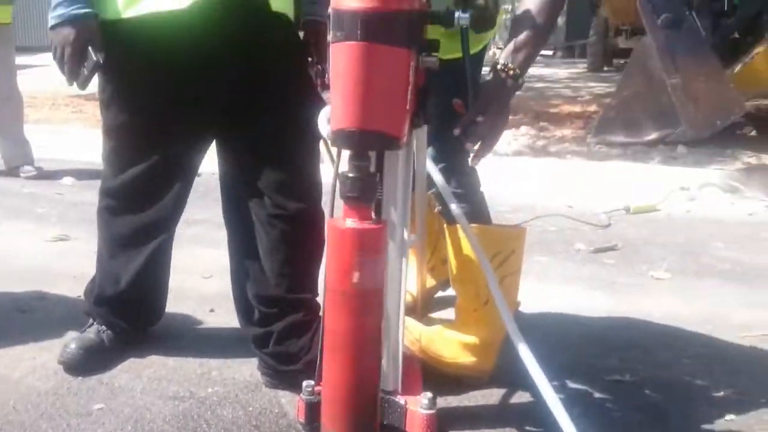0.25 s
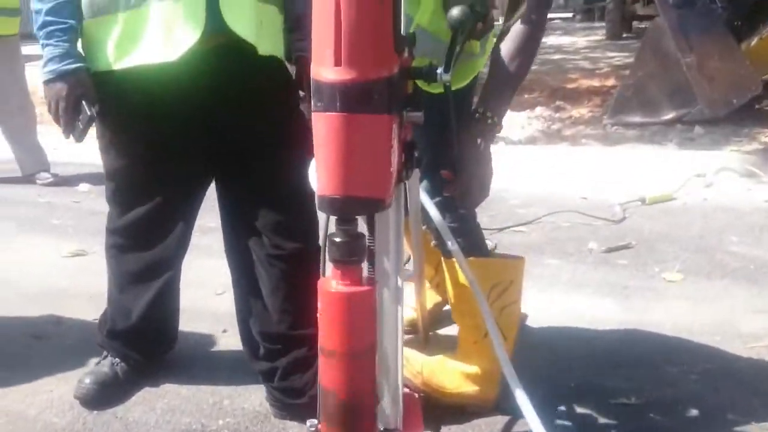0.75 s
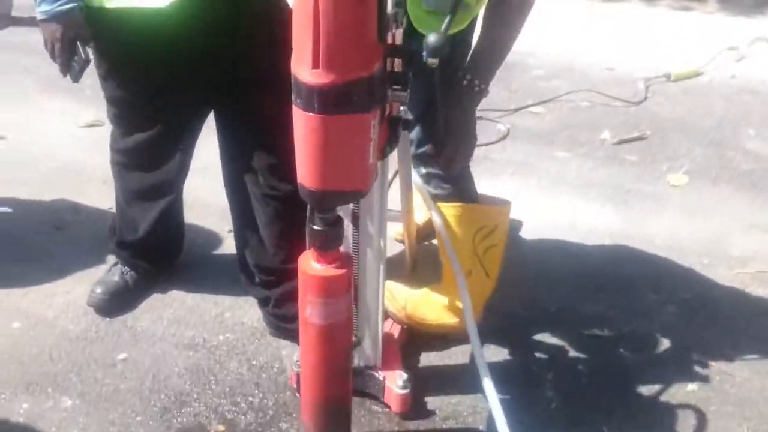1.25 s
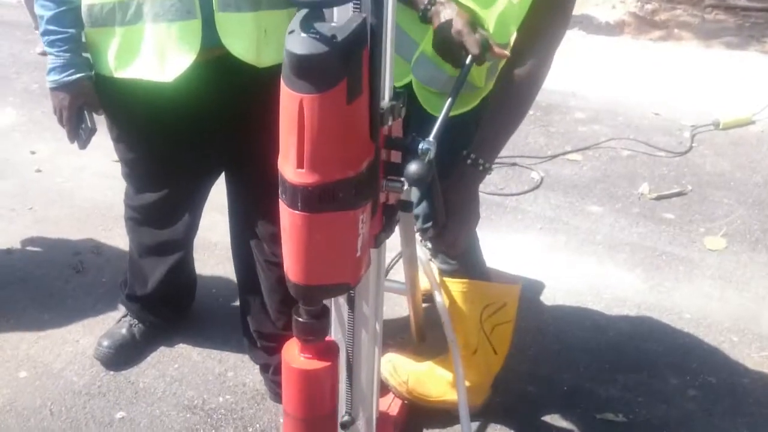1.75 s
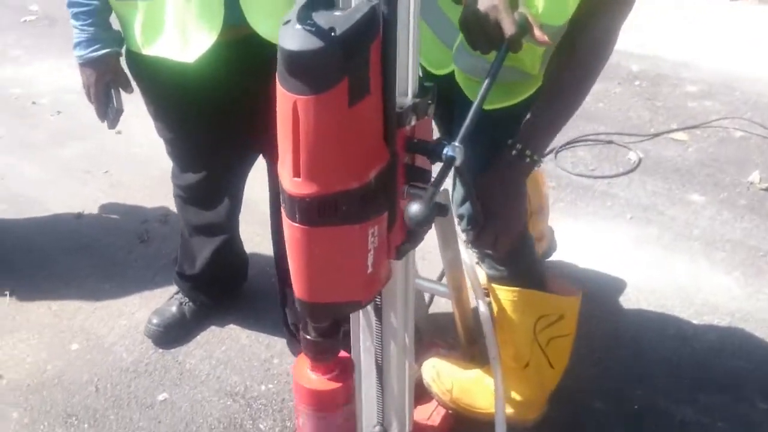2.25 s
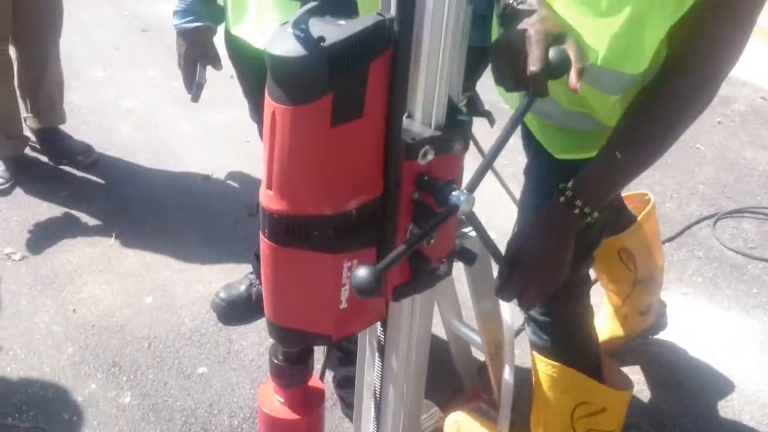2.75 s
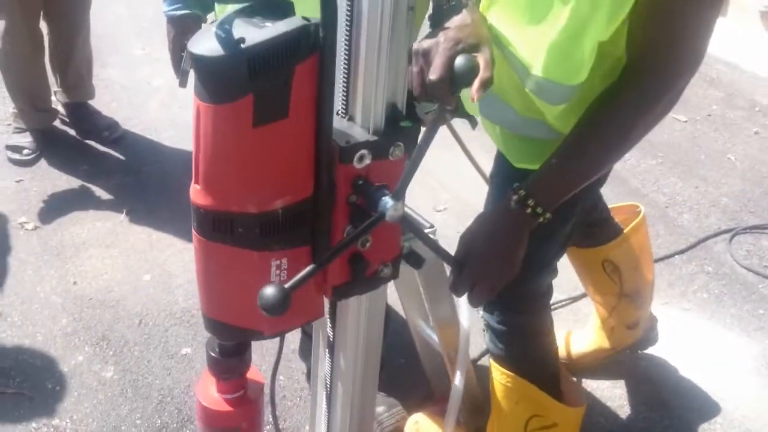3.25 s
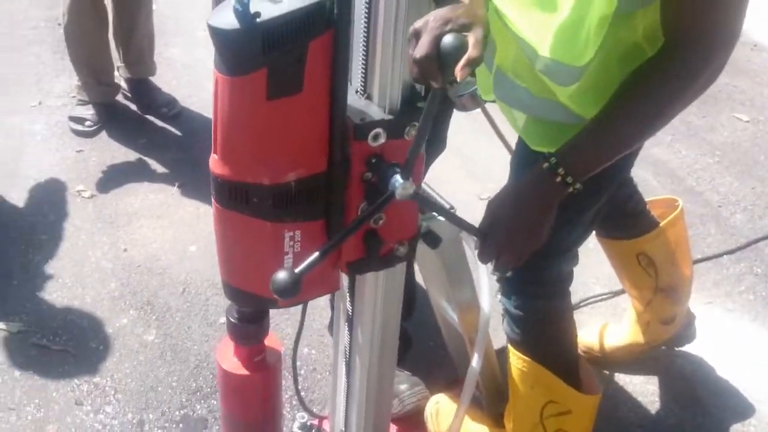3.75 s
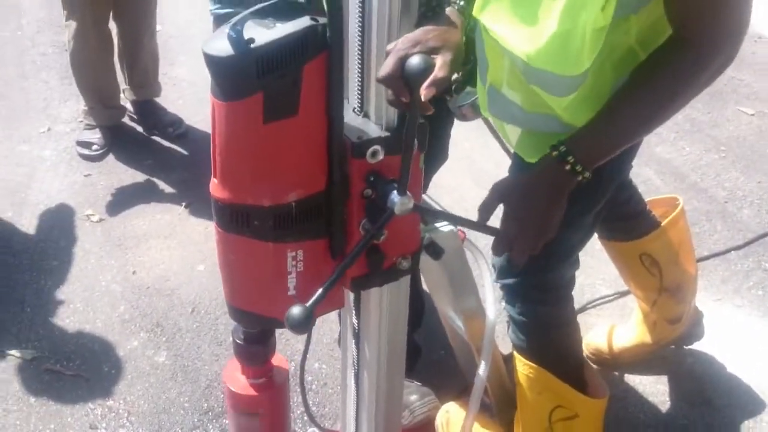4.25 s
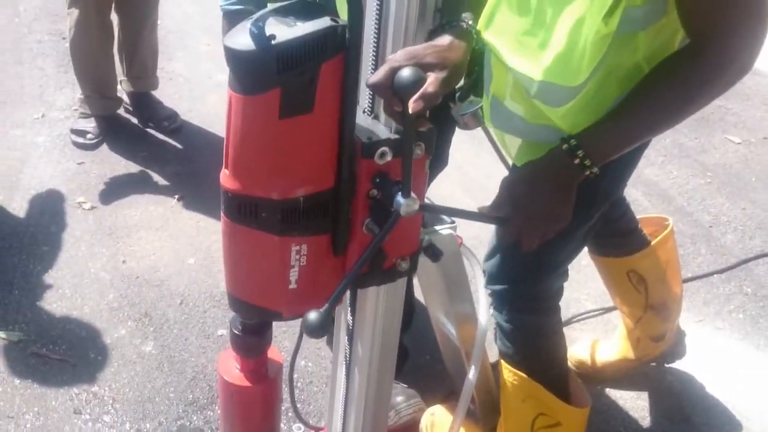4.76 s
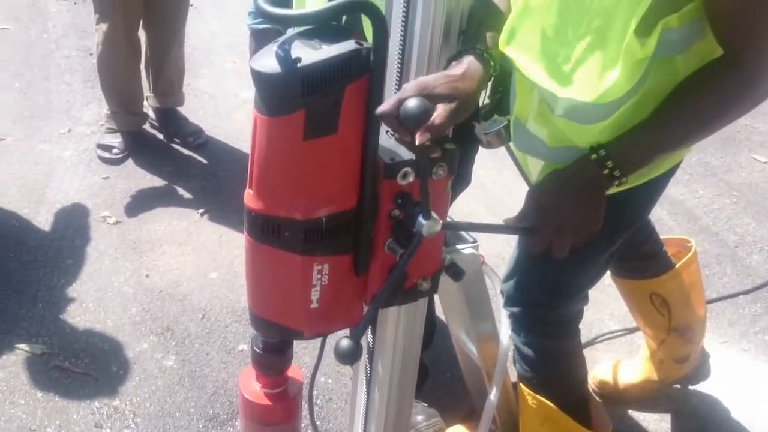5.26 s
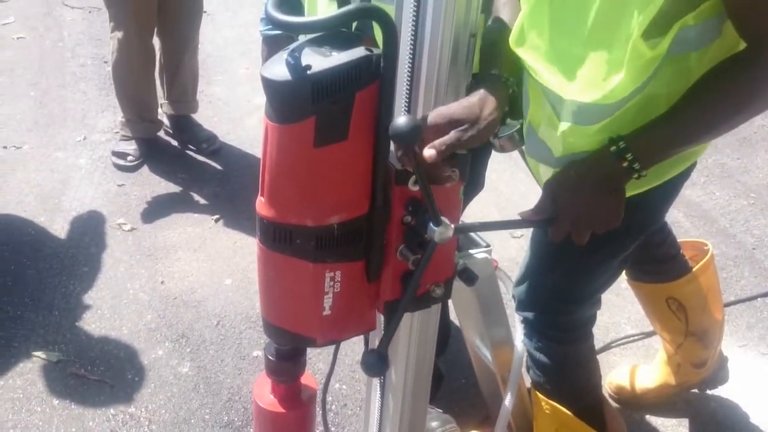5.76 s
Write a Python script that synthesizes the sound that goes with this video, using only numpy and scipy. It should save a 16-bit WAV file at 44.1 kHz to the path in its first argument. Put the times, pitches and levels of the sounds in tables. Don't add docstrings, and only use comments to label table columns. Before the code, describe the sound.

Outdoors, a high motor whine and broad spray-like roar run steadily as a steel barrel touches the road, rings sharply and gradually becomes muffled.

```python
import sys
import numpy as np
from scipy import signal
from scipy.io import wavfile
from scipy.ndimage import uniform_filter1d, map_coordinates

SR = 44100
rng = np.random.default_rng(int(sys.argv[2]) if len(sys.argv) > 2 else 0)


def gain_from_db(level_db):
    decades = np.asarray(level_db, float) / 20
    return 10 ** decades


def to_wav(sig):
    pcm = np.clip(np.atleast_2d(sig), -1, 1) * 32767
    pcm = np.round(pcm).astype(np.int16)
    wavfile.write(sys.argv[1], SR, pcm.T)


N = 265041
T = np.arange(N) / SR


def evened(x):
    return x / np.sqrt(np.mean(x ** 2) + 1e-20)


def columns(rows, t):
    s, *cols = np.transpose(rows)
    return [np.interp(t, s, c) for c in cols]


def spectra(rows, hz):
    f, *cols = np.transpose(rows)
    return np.array([np.interp(np.log(hz + 1), np.log(f + 1), c) for c in cols])


def drift(hz):
    steps = map_coordinates(rng.standard_normal(400), [T[::64] * hz], order=3)
    return np.interp(T, T[::64], evened(steps))


def swells(rest_db, rows):
    bells = sum(gain_from_db(2 * db) * np.exp(-((T - s) / length_s) ** 2) for s, length_s, db, *_ in rows)
    return 10 * np.log10(gain_from_db(2 * rest_db) + bells)


def ports(left, right, pan_db):
    left_gain = gain_from_db(np.minimum(pan_db, 0))
    right_gain = gain_from_db(-np.maximum(pan_db, 0))
    return np.array([left * left_gain, right * right_gain])


# time in seconds, nearness to the motor 0-1, roar in dB.
WALK = [(0, 0.1, 0.15), (0.55, 0.1, -0.05), (0.7, 0.25, -0.5), (0.95, 0.26, -2.5), (1.3, 0.48, 0.4),
        (1.7, 0.53, 0.5), (2.2, 0.7, 0.5), (2.7, 0.77, 0.4), (3.2, 0.92, -0.64), (4.2, 0.95, 0),
        (4.7, 0.91, -0.36), (5.6, 1, 0), (6.02, 0.96, -0.8)]
# time in seconds, shaft speed in Hz.
SHAFT = [(0, 333.8), (0.35, 333.7), (0.58, 332.4), (0.92, 328.7), (1.22, 330.7), (1.4, 326.4),
         (1.52, 325.4), (1.78, 326.8), (2.1, 325.4), (2.3, 327.2), (2.45, 329.8), (2.7, 331.3),
         (4.02, 329.5), (4.17, 323.6), (4.38, 321.5), (4.68, 323.4), (5.05, 324), (5.9, 323)]
# centre in seconds, length in seconds, level in dB, left-right
# in dB.
WHINE = [(0.31, 0.12, -32, 17), (0.6, 0.07, -40, 11), (0.9, 0.14, -37.5, 14), (1.18, 0.062, -35, 5),
         (1.41, 0.035, -28.5, 21), (1.68, 0.088, -35, 8), (1.95, 0.13, -35, 8), (2.23, 0.1, -31, 8),
         (2.52, 0.11, -35, 21), (3.0, 0.038, -35, 21), (3.19, 0.05, -37, 16), (3.7, 0.18, -38, 9),
         (4.11, 0.06, -34, 13), (4.43, 0.058, -32, 6), (4.79, 0.11, -34, 6), (5.22, 0.13, -41, 5),
         (5.81, 0.17, -36, 13)]
# level far and idle in dB, gain near in dB, gain at full load
# in dB.
MESHES = [
    (-68.5, 15.5, 3),
    (-55, 3, 7),
    (-65, 21.5, 7.5),
]
MESH_PANS_DB = (-2.0, 0.3, 16)
WAVERS_DB = (2.7, 1.0, 1.0, 2.5)
LAGS_RAD = (2.0, 1.5, 1.6, 2.4)
WANDERS_RAD = (0.35, 0.1, 0.12, 0.4)
# time in seconds, length in seconds, level in dB.
PINION_SINGS = (4.64, 0.23, -41.5)


def motor():
    free_hz, full_sag_hz = 333.8, 12
    let_go_s, recover_hz_per_s = 5.9, 75
    slots, mesh_orders = 30, (3.05, 8, 16)
    whine_rest_db = -46
    runout_order, runout_db = 0.245, 5

    shaft_hz = columns(SHAFT, T)[0] + recover_hz_per_s * np.maximum(T - let_go_s, 0)
    load = (free_hz - shaft_hz) / full_sag_hz
    near = columns(WALK, T)[0]
    turn_rad = 2 * np.pi * np.cumsum(shaft_hz) / SR

    levels_db = [swells(whine_rest_db, WHINE)]
    for idle_db, near_db, load_db in MESHES:
        levels_db.append(idle_db + near_db * near + load_db * load ** 2)
    levels_db[2] = swells(levels_db[2], [PINION_SINGS])
    levels_db[1] = levels_db[1] + runout_db * np.cos(runout_order * turn_rad)

    orders = (slots, *mesh_orders)
    pans_db = (columns(WHINE, T)[-1], *MESH_PANS_DB)
    out = np.zeros((2, N))
    lines = zip(orders, levels_db, pans_db, WAVERS_DB, LAGS_RAD, WANDERS_RAD)
    for order, db, pan_db, waver_db, lag_rad, wander_rad in lines:
        pair = []
        for late_rad in (0, lag_rad):
            gain = gain_from_db(db + waver_db * drift(hz=42))
            pair.append(gain * np.sin(order * turn_rad - late_rad + wander_rad * drift(hz=6)))
        out += np.sqrt(2) * ports(*pair, pan_db)
    return out


# (per Hz, +60).
SPRAY = [(120, -30, -25.5), (245, -30.5, -27.5), (605, -18, -15.5), (1270, -14.5, -11), (2340, -11.5, -8.5),
         (3330, -7, -5.5), (4265, -5, -7.5), (4930, -2.5, -16), (5700, -6, -16), (7540, -8.5, -11),
         (9800, -7.5, -14), (10480, 1, -10), (11540, -12.5, -19), (15400, -28, -19.5)]
# (per Hz, +60).
AIR = [(120, -36.5, -31.5), (300, -26.5, -27.5), (540, -17.5, -14.5), (1280, -14, -10.5), (2300, -9.5, -5),
       (3360, -9, -8.5), (4070, -1.5, -12.5), (5200, -3, -23.5), (6740, -8, -13), (8940, -8.5, -14),
       (10100, -4, -25), (11430, -12, -21), (13200, -23, -22.5), (15700, -31, -25.5)]
# centre in Hz, width in Hz, dB near road, dB near motor.
HUMPS = [(250, 46, -3.5, 3), (407, 26, 12.5, -9), (670, 150, 4.5, 3), (720, 61, -6.5, -0.5),
         (810, 75, -2, -2), (960, 50, 5, 3), (1170, 81, 5, 3), (1400, 82, -0.5, -2.5), (1587, 43, 6.5, 3.5),
         (1796, 52, -12, -2.5), (2027, 430, 1.5, 0.5), (3130, 55, 2.5, 3.5), (4950, 510, 2.5, 6),
         (6180, 250, 4.5, 2.5), (8250, 390, -3, 4), (10200, 430, 0.5, -0.4), (10920, 280, -6.5, 9.5),
         (12200, 740, 2, 2)]
# frequency in Hz, likeness of the ports 0-1.
SAME = [(60, 0.72), (250, 0.9), (550, 0.95), (1000, 0.88), (1500, 0.7), (2400, 0.4), (4600, 0.5),
        (7000, 0.38), (10000, 0.4), (12000, 0.1)]
# frequency in Hz, lead of the left port in radians.
LEAD = [(60, 0.7), (300, 0.76), (600, 0.74), (1100, 1.67), (1700, 2.16), (2500, 2.05), (3600, 5.84),
        (4300, 8.7), (5500, 8.13), (12000, 7.7)]


def roar():
    body, fizz = (0.3, 3.17, 2.36), (2, 3.7, 0.6)
    frames, hz = N // 256 + 5, np.fft.rfftfreq(1024, 1 / SR)
    near, roar_db = columns(WALK, np.arange(frames) * 256 / SR)
    near = np.clip(near, 0, 1)

    def along_walk(road_db, lost_db, motor_db):
        return road_db * (1 - near) + motor_db * near - lost_db * np.sin(np.pi * near) ** 2

    humps_db = sum(np.array([[road], [air]]) * np.exp(-((hz - f) / w) ** 2) for f, w, road, air in HUMPS)
    spray_db = spectra(SPRAY, hz) + humps_db[0]
    air_db = spectra(AIR, hz) + humps_db[1]
    db = spray_db[..., None] * (1 - near) + air_db[..., None] * near
    db += np.outer(1 / (1 + (hz / 1500) ** 4), along_walk(*body))
    db += np.outer(1 / (1 + (5600 / (hz + 1)) ** 8), along_walk(*fizz))
    db += roar_db

    a, b, c, d, fine, wide = rng.standard_normal((frames, 513, 6)).T
    fine = evened(uniform_filter1d(uniform_filter1d(fine, 3, 0), 60, 1))
    wide = evened(uniform_filter1d(uniform_filter1d(wide, 40, 0), 6, 1))
    same = np.clip(spectra(SAME, hz).T, 0, 1)
    left, own = a + 1j * b, c + 1j * d
    right = same * left * np.exp(-1j * spectra(LEAD, hz).T) + np.sqrt(1 - same ** 2) * own
    z = np.array([left, right]) * gain_from_db(db + 1.95 * fine + 0.5 * wide)
    return gain_from_db(-45.0) * signal.istft(z, nperseg=1024, noverlap=768)[1][:, :N]


# centre in seconds, length in seconds, level in dB.
GUSTS = [
    (0.25, 0.3, -68),
    (2.5, 0.13, -67.5),
    (3.4, 0.1, -74),
    (4.107, 0.05, -68),
    (4.35, 0.2, -70),
    (5.15, 0.38, -69),
    (5.796, 0.36, -71),
]


def wind():
    breeze_db = -76.5
    shared, left, right = rng.standard_normal((3, N))
    band = signal.butter(2, [40, 95], "bandpass", fs=SR, output="sos")
    low = signal.sosfilt(band, [shared + 0.69 * left, shared + 0.66 * right])
    tilt_db = np.array([[-3.0], [3.0]])
    return evened(low) * gain_from_db(swells(breeze_db, GUSTS) + 0.89 * drift(hz=6) + tilt_db)


def ring(x, hz, width_hz):
    r = np.exp(-np.pi * width_hz / SR)
    mode = [1, 0, -1, 1, -2 * r * np.cos(2 * np.pi * hz / SR), r * r]
    rung = evened(signal.sosfilt([mode, mode], x))
    return evened(rung / (uniform_filter1d(rung ** 2, size=1200) + 0.05) ** 0.28)


# frequency in Hz, width in Hz, level in dB, left-right in dB.
BARREL = [(912, 30, -12.5, 15), (2082.5, 31, 2.5, -12.5), (2697, 24, -5.5, 1.5), (3662, 43, 6, 10),
          (3936, 56, 7.5, 13), (4285, 65, 0, 18), (4560, 97, -2, 9.5), (4840, 145, -2.5, 25),
          (5090, 77, 4.5, 10), (5310, 150, -3, 11), (6420, 200, 0, 3), (6740, 180, -4.5, -4)]
GROUPS = (1, 0, 1, 1, 3, 3, 2, 2, 3, 2, 3, 3)
# level at contact in dB, fade in dB per second.
RING = [
    (-44.5, 2.0),
    (-43, 2),
    (-34, 1.5),
    (-46.5, 4.5),
]
# centre in seconds, length in seconds, level in dB.
CHATTER = [
    [(0.61, 0.032, -37), (0.88, 0.043, -43), (1.15, 0.12, -36), (4.6, 0.012, -40), (4.77, 0.015, -45)],
    [(0.565, 0.038, -35.5), (0.72, 0.042, -33), (0.89, 0.068, -42.5), (1.55, 0.15, -51), (2.12, 0.11, -44)],
    [(0.57, 0.045, -34), (0.78, 0.14, -33.5), (1.4, 0.29, -35.5), (2.6, 0.4, -45), (3.4, 0.38, -39)],
    [(0.59, 0.082, -38), (1.45, 0.089, -48)],
]
# time in seconds, share of the ring damped by slurry 0-1.
SINK = [
    (0, 0.011),
    (1.4, 0.11),
    (1.6, 0.33),
    (2.1, 0.5),
    (2.8, 0.45),
    (6.02, 1),
]


def barrel():
    touch_s, bite_s, untouched_db = 0.46, 0.073, -34
    contact_db = untouched_db * np.clip(1 - (T - touch_s) / bite_s, 0, 1)
    groups_db = []
    for (db, fade_db_per_s), rows in zip(RING, CHATTER):
        groups_db.append(contact_db + swells(db - fade_db_per_s * (T - touch_s), rows))

    damped = np.clip(columns(SINK, T)[0], 0, 1)
    grit = rng.standard_normal((3, N))
    heard = 0.75 * grit[0] + 0.65 * grit[1:]
    heard[1] *= -1
    out = np.zeros((2, N))
    for (hz, width_hz, db, pan_db), group in zip(BARREL, GROUPS):
        sharp = ring(heard, hz, width_hz)
        broad = ring(heard[:, ::-1], hz * 1.01, 4.3 * width_hz)
        tube = np.sqrt(1 - damped) * sharp + np.sqrt(damped) * broad
        out += ports(*tube, pan_db) * gain_from_db(groups_db[group] + db + 2.0 * drift(hz=25))
    return out


def resonate(x, hz, width_hz):
    turn = np.exp(2j * np.pi * np.cumsum(hz * np.ones(N)) / SR)
    r = np.exp(-np.pi * width_hz / SR)
    return evened((turn * signal.lfilter([1], [1, -2 * r, r * r], x / turn)).real)


# time in seconds, frequency in Hz, level in dB.
STAND = [
    (1.35, 233, -84),
    (1.7, 250, -66),
    (2.3, 236, -61.5),
    (2.6, 276, -63),
    (3.55, 273, -60.5),
    (4.5, 293, -67),
    (6.02, 300, -59),
]


def stand():
    hz, db = columns(STAND, T)
    hum = resonate(rng.standard_normal(N), hz, width_hz=43.0)
    return gain_from_db(db) * ports(hum, hum, pan_db=-6.5)


def scene():
    return motor() + roar() + wind() + barrel() + stand()


def band_limit(x):
    return signal.sosfilt(signal.butter(12, 15750, fs=SR, output="sos"), x)


def record(dry):
    edge_hz = 15720
    cut = signal.sosfilt(signal.butter(2, 35, "highpass", fs=SR, output="sos"), dry)
    lowpass = signal.firwin(511, edge_hz, window=("kaiser", 9), fs=SR)
    mix = signal.oaconvolve(cut, lowpass[None], "same")
    return band_limit(mix)


dry = scene()
out = record(dry)
to_wav(out)
```